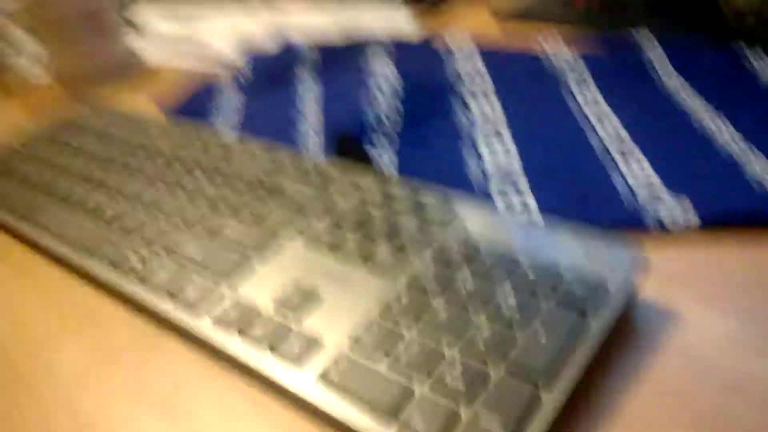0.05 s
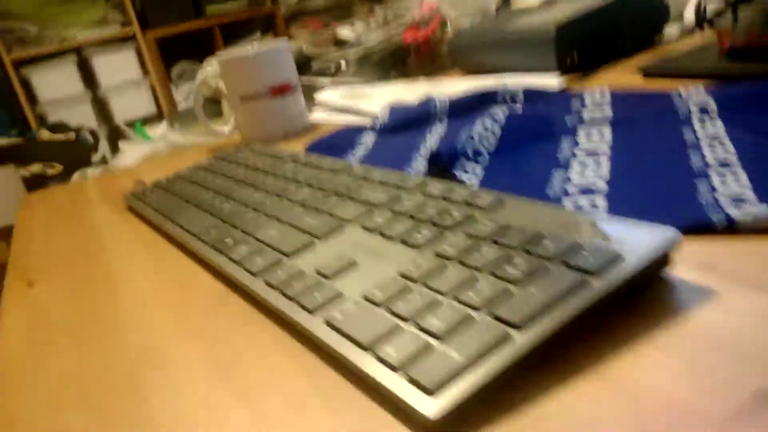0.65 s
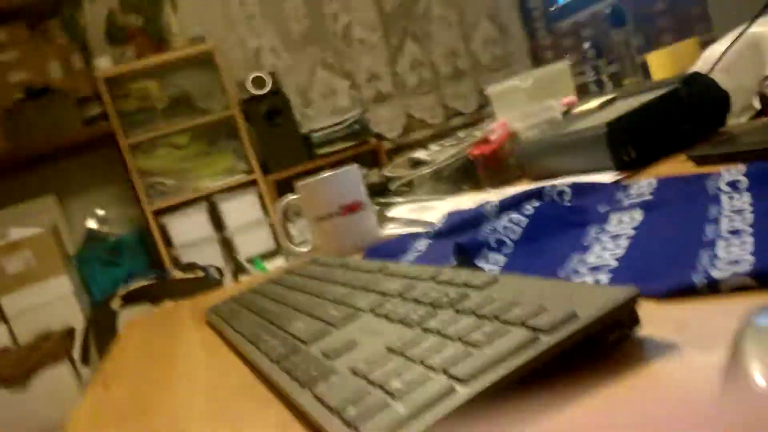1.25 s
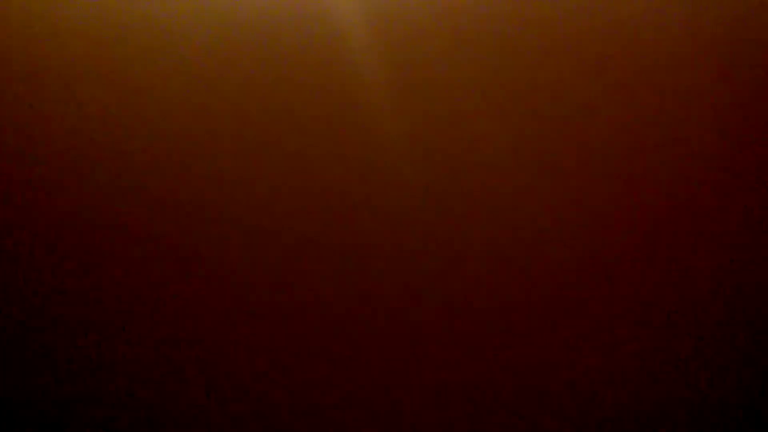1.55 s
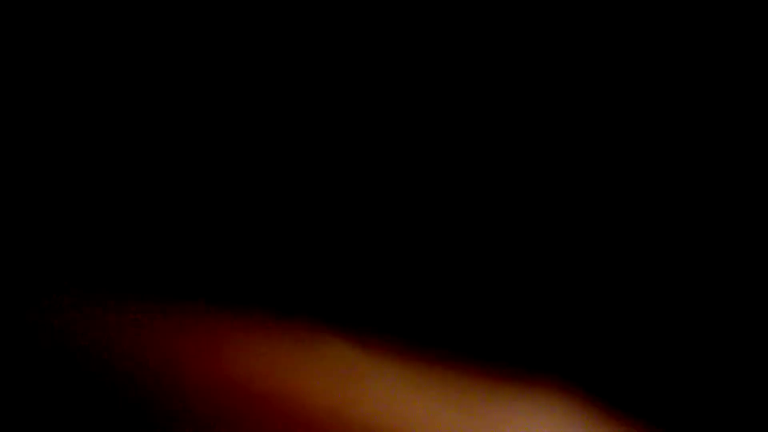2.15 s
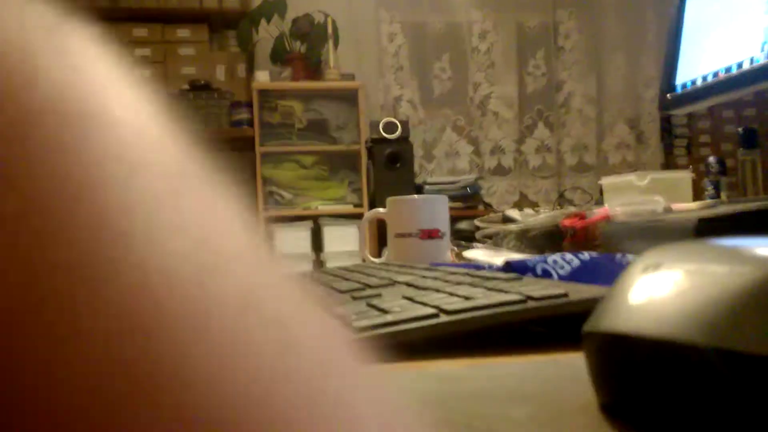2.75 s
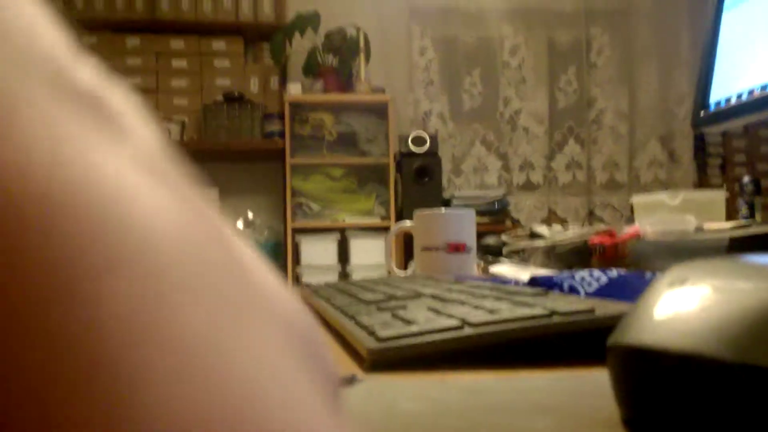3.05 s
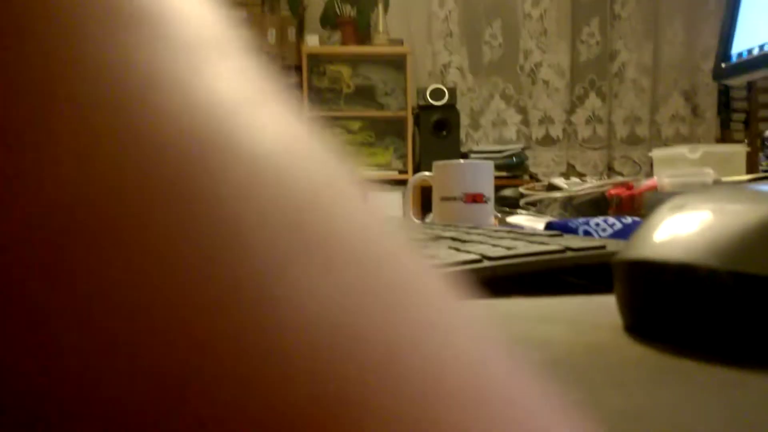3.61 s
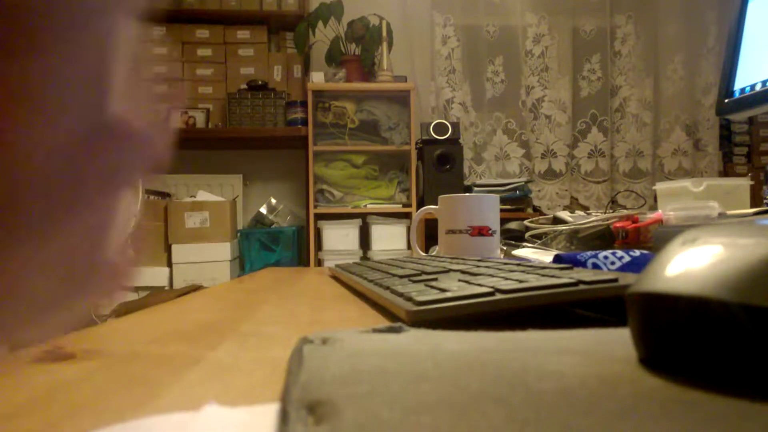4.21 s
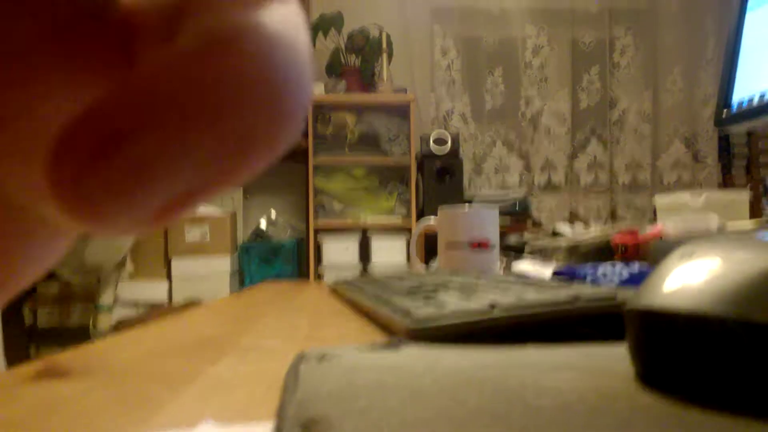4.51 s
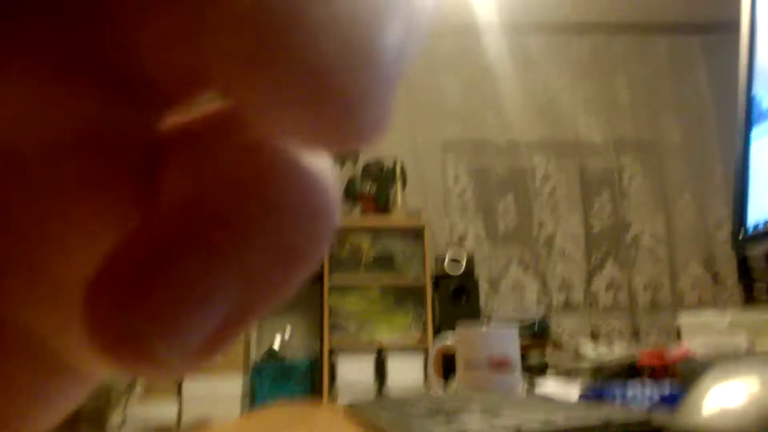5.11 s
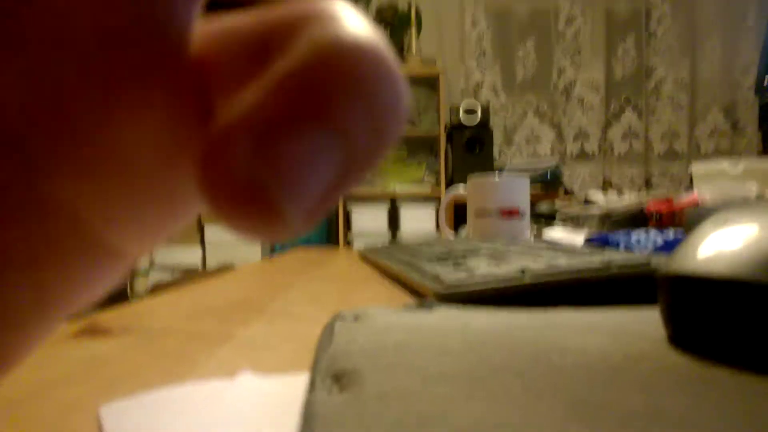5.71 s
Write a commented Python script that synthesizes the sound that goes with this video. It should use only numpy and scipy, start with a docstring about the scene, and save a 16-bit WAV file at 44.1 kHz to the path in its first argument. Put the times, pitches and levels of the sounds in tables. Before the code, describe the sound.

A phone is handled with faint clicks and rustles, knocks down loudly on a wooden desk, then slides and thuds dully.

```python
"""A small room with a wooden desk. A hand carries a phone, sets it down with a knock and shifts it.
Plastic ticks and snaps nearby, a button clicks, a sleeve rustles and fingers bump the case,
all over a quiet hiss and the low rumble of the grip. Each knock rattles the phone's shell and
rings the desk top and its clutter. The phone scuffs along, catching on the grain of the wood,
and drops back with a dull thud."""
import sys
import numpy as np
from scipy import signal
from scipy.fft import rfft, irfft, next_fast_len
from scipy.io import wavfile

SR = 44100
rng = np.random.default_rng(int(sys.argv[2]) if len(sys.argv) > 2 else 0)


def materialize(psi):
    """Save the field psi as 16-bit PCM at rate SR to the path in sys.argv[1].

    A 1-D psi becomes a single channel; in a 2-D psi each row is a channel.
    """
    bounded = np.clip(np.atleast_2d(psi).T, -1, 1)
    quanta = np.round(bounded * 32767).astype(np.int16)
    wavfile.write(sys.argv[1], SR, quanta)


N = 258681
TIME = np.arange(N) / SR
AGE = np.arange(SR // 2) / SR  # seconds since a hit

# The room's decay. Each row: frequency in Hz, t60 in seconds.
ROOM_DECAY = [(100, 0.43), (500, .28), (1500, .26), (5000, 0.19), (12000, .16)]

# Tone colours, drawn like EQ curves. Each row: frequency in Hz, level in dB.
HISS_EQ = [(30, 6), (120, 8), (250, 6.5), (500, 1.5), (1200, -1.5), (2000, -4), (5500, -4.5), (6500, -11.5),
           (7800, -18), (10000, -17.5), (13000, -14.5), (16000, -20)]
HAND_EQ = [(10, -6), (28, -2), (50, -4), (100, -14.5), (200, -23.5), (500, -56)]
CLOTH_EQ = [(150, 9), (400, 5.5), (900, 0), (1600, 1), (2600, -4.5), (4300, -4.5), (5800, -6.5),
            (7000, -16), (9500, -20.5), (12500, -21.5), (16000, -28.5)]
FIZZ_EQ = [(1000, -30), (4000, -0.5), (6000, 0.5), (8000, -5.5), (12500, -3.5), (16000, -6)]  # the finest friction
TICK_EQ = [(200, -12), (600, -5.5), (1000, -6.5), (1700, -2), (2300, -2.5), (2800, -3), (4700, -3),
           (6300, -5.5), (7500, -18.5), (9500, -23.5), (12000, -21), (16000, -24)]
SNAP_EQ = [(200, -5), (600, -1.5), (1200, 1), (1700, -2), (2300, 1.5), (3100, 0), (3800, -16), (6000, -13),
           (8000, -18), (11000, -31), (16000, -43)]
SCRAPE_EQ = [(50, -4.5), (130, 9), (250, 1), (340, -4.5), (600, -1), (1200, -9.5), (2000, -16), (3000, -31),
             (4200, -24.5), (5500, -34), (7500, -45), (12500, -45), (16000, -51)]
CATCH_EQ = [(150, -6.5), (700, -3.5), (1500, 0), (2800, -7), (4500, -6.5), (7000, -20), (16000, -29.5)]  # a hard catch on the wood
CLUTTER_EQ = [(120, -10), (330, 8.5), (600, -3), (1300, -1), (1900, -12.5), (2400, -27.5), (5000, -27.5),
              (7000, -38), (12500, -45), (16000, -47.5)]  # loose things on the desk
CONTACT_EQ = [(30, -21.5), (100, -7), (250, 1), (450, -6), (800, -5), (2000, -12), (5000, -17),
              (6500, -35.5), (9000, -38), (13000, -29.5), (16000, -29.5)]  # the phone meeting the desk

# Resonances of the struck parts. Each row: pitch in Hz, level in dB, t60 in seconds.
PLASTIC_MODES = [(603, -8, .08), (1210, -10, 0.046), (1686, 4, 0.036), (2113, -1, 0.047)]
BUTTON_MODES = [(384, -11, 0.081), (515, -2, 0.093), (804, -13, 0.032), (1120, -6, 0.024),
                (1400, -3, 0.024), (1666, 2, 0.026), (2100, -1.5, 0.025), (2770, -1, 0.016),
                (3860, -5.5, .012), (5500, -8.5, 0.01)]
DESK_MODES = [(47.2, -26, 0.93), (141, -14, 0.16), (202.4, -3, 0.12), (228.8, -5, .12), (279, -11, 0.097),
              (312.2, -4.5, 0.16), (387.3, -5, 0.12), (471.5, 3, 0.085), (603, -28, 0.39),
              (671, -18, 0.069), (910, -21, 0.083), (1105, -7.5, .06), (1286, -14.5, 0.075)]
SHELL_MODES = [(1080, -10, .014), (1328, -2.5, 0.0093), (1890, -0.5, 0.012), (2680, -15.5, 0.01)]
PING_AT, PING = 4.8285, [(1860, -47.5, 0.038), (3600, -53, 0.025), (4260, -50, 0.029)]  # start in s, modes

# The hand shifts its grip. Each row: peak time in seconds, level in dB, length in seconds.
GRIP_SHIFTS = [(1.708, -49, 0.51), (2.351, -54.5, 0.92), (3.379, -57.5, .3), (4.637, -48, 0.27),
               (5.2, -57, 0.39)]
# Soft bumps: low thumps as the phone sways and settles, and higher pats of fingers on the case. Each row: start
# in seconds, level in dB, pitch in Hz, t60 in seconds.
THUMPS_AND_PATS = [(1.028, -38, 219, 0.025), (1.048, -29.5, 30.6, 0.21), (1.69, -40, 83, 0.11),
                   (1.849, -27, 39, 0.095), (2.03, -42.5, 215, 0.031), (2.346, -43, 47.7, 0.33),
                   (2.845, -46, 249, 0.063), (3.042, -45, 209, 0.026), (3.152, -46, 220, 0.03),
                   (3.563, -45.5, 303, 0.077), (3.685, -42, 338, 0.07), (4.672, -21, 73.4, 0.043),
                   (5.025, -41.5, 258, .05), (5.129, -37.5, 246, 0.065), (5.7278, -45, 216, .06)]
# Sleeve and skin brush along. Each row: peak time in seconds, level in dB, length in seconds,
# centre in Hz, fizz trim in dB.
BRUSHES = [(1.277, -59.5, 0.18, 3580, -14), (1.396, -52, 0.069, 4060, -23), (1.78, -49.5, .063, 4300, -23),
           (1.857, -56.5, 0.047, 1580, -9), (1.971, -64.5, 0.4, 1440, -9), (2.221, -58.5, 0.13, 1720, -10),
           (2.44, -66, 0.26, 2400, -2), (2.586, -59, 0.11, 3860, -1.5), (2.67, -63.5, 0.25, 2740, -6),
           (3.159, -53.5, 0.069, 2200, -2.5), (3.215, -51.5, 0.091, 2200, -1),
           (3.869, -61.5, 0.088, 2490, -15)]
# Dry plastic ticks a little way off. Each row: start in seconds, level in dB, length in seconds,
# hardness as a cutoff in Hz, ring in dB.
PLASTIC_TICKS = [(0.4952, -40, 0.043, 12000, -28), (0.564, -42, 0.048, 14000, -21),
                 (.664, -50, 0.035, 4000, -19), (0.676, -43.5, 0.038, 4600, -23),
                 (0.7484, -39, 0.026, 8900, -17), (0.8123, -40, 0.027, 5100, -17),
                 (0.9, -50, 0.045, 12000, -25), (0.916, -46, 0.048, 14000, -29.5)]
# Sharp snaps of plastic. Each row: start in seconds, level in dB, length in seconds.
PLASTIC_SNAPS = [(1.5238, -41.5, 0.039), (1.5457, -28, 0.036)]
# A button pressed and let go. Each row: start in seconds, level in dB.
BUTTON_CLICKS = [(1.6892, -35), (2.3359, -35.5), (2.003, -58.5)]
# The phone slides. Each row: time of top speed in seconds, level in dB, length in seconds,
# grit at top speed in dB.
SLIDES = [(2.886, -55.5, 0.085, -8.5), (3.566, -59.5, 0.14, -20), (3.731, -53, 0.15, -12),
          (4.54, -50.5, 0.058, -14), (4.654, -42, 0.097, -4), (4.768, -59, 0.18, -17),
          (5.012, -58.5, 0.036, -13.5), (5.196, -42.5, 0.12, -9.5), (5.401, -46, 0.059, -19)]
# The sliding phone catches hard on the grain. Each row: start in seconds, level in dB.
HARD_CATCHES = [(3.859, -48), (4.515, -54), (4.589, -52), (4.644, -34), (4.657, -37), (5.196, -38.5),
                (5.376, -56)]
# The phone hits the desk. Each row: start in seconds, level in dB, hardness as a cutoff in Hz,
# desk ring trim in dB, shell rattle trim in dB.
DESK_HITS = [(3.277, -8.5, 7500, 1.5, -35), (3.2805, -3.5, 8900, -9, -4.5), (3.2816, -5, 1510, -8, 5),
             (3.2955, -19.5, 7010, 6, -1), (4.6686, -33.5, 3000, -3, 17.5), (4.671, -15.5, 248, 2, -12),
             (4.699, -29, 295, 7, -8)]


def amp(db):
    """Decibels to gain."""
    return 10 ** (np.asarray(db) / 20)


def unit_rms(x):
    """Scales to rms 1."""
    return x / np.sqrt(np.mean(x ** 2) + 1e-20)


def curve_at(points, hz):
    """Reads a curve on a log-frequency axis."""
    f, value = np.transpose(points)
    return np.interp(np.log(hz + 1), np.log(f + 1), value)


def add(mix, s, sound):
    """Mixes a sound in at s seconds."""
    part = mix[round(s * SR):][:len(sound)]
    part += sound[:len(part)]


def through(x, response):
    """Convolves and keeps the length."""
    return signal.fftconvolve(x, response)[:len(x)]


def cut(x, hz, kind="low", order=2):
    """Low-pass or high-pass; the softer a contact, the lower its low-pass."""
    return signal.sosfilt(signal.butter(order, hz, kind, fs=SR, output="sos"), x)


def impulse(eq, size=4096):
    """A minimum-phase click with this tone colour, of energy 1."""
    log_gain = np.log(amp(curve_at(eq, abs(np.fft.fftfreq(size, 1 / SR)))))
    spectrum = np.exp(np.conj(signal.hilbert(log_gain)))
    pulse = np.fft.ifft(spectrum).real[:size // 2]
    return pulse / np.linalg.norm(pulse)


def noise(eq, grain_db=0):
    """Coloured noise of rms 1; grain_db makes it lumpy, as catching fibres do."""
    lumps = np.interp(TIME, np.linspace(0, N / SR, 3000), rng.standard_normal(3000))
    size = next_fast_len(N)
    bins = rfft(rng.standard_normal(N) * amp(grain_db * lumps), size)
    colour = amp(curve_at(eq, np.fft.rfftfreq(size, 1 / SR)))
    return unit_rms(irfft(bins * colour, size)[:N])


def ring(modes):
    """Dying sines of a struck object."""
    return sum(amp(db - 60 * AGE / t60) * np.sin(2 * np.pi * hz * AGE) for hz, db, t60 in modes)


def chatter(length, rise):
    """A burst of tiny contacts that swells and dies away, 60 dB in length seconds."""
    return rng.standard_normal(len(AGE)) * amp(-60 * AGE / length) * (1 - np.exp(-AGE / rise))


def stroke(t, length, rise_share=0.59, shape=2):
    """Bell-shaped speed of one gesture: up to 1 at t = 0 and down again."""
    width = length * np.where(t < 0, rise_share, 1 - rise_share)
    return np.exp(-abs(t / width) ** shape)


def room(x, wet_db, delay, linger=0.82):
    """Adds dense reflections from desk clutter and walls, each band dying at its own speed."""
    taps = rng.choice([-1., 1.], len(AGE)) * (rng.random(len(AGE)) < .2) * (AGE > delay)
    hz, t, bands = signal.stft(taps, SR, nperseg=256)
    t60 = linger * curve_at(ROOM_DECAY, hz)[:, None]
    tail = signal.istft(bands * amp(-60 * t / t60), SR, nperseg=256)[1]
    return x + amp(wet_db) * through(x, tail / np.linalg.norm(tail))


def hiss():
    """A quiet, steady bed under everything."""
    return amp(-66.5) * noise(HISS_EQ)


def grip(rest_db=-60.5):
    """Low rumble of the holding hand, swelling as it shifts, with soft thumps and finger pats."""
    shift_power = sum((amp(db) * stroke(TIME - s, length)) ** 2 for s, db, length in GRIP_SHIFTS)
    rumble = noise(HAND_EQ) * np.sqrt(amp(rest_db) ** 2 + shift_power)
    bumps = np.zeros(N)
    for s, db, hz, t60 in THUMPS_AND_PATS:
        add(bumps, s, ring([(hz, db, t60)]))
    return rumble + room(bumps, wet_db=-8.5, delay=0.0026)


def sleeve_rustles():
    """Fibres catch and slip: each brush swells and fades, its hiss gathered round its own pitch."""
    out, t = np.zeros(N), np.arange(-16384, 16384) / SR
    hz = np.fft.rfftfreq(len(t), 1 / SR)
    cloth, fine = amp(curve_at(CLOTH_EQ, hz)), amp(curve_at(FIZZ_EQ, hz))
    for s, db, length, centre_hz, fizz_db in BRUSHES:
        lumps = np.interp(t, t[::80], rng.standard_normal(len(t[::80])))
        rub = rfft(rng.standard_normal(len(t)) * amp(1.9 * lumps))
        octaves = 1.05 * 2000 / centre_hz  # faster, brighter brushes are narrower
        focus = amp(-11.5) + np.exp(-.5 * (np.log2((hz + 1) / centre_hz) / octaves) ** 2)
        body = unit_rms(irfft(rub * focus * cloth))
        fizz = amp(fizz_db - 12) * unit_rms(irfft(rub * fine))
        add(out, s + t[0], amp(db) * stroke(t, length, rise_share=.44) * (body + fizz))
    return out


def ping():
    """A tiny hard part, touched once, rings."""
    out = np.zeros(N)
    add(out, PING_AT, amp(-3) * ring(PING))
    return out


def plastic_ticks():
    """Plastic parts catch and let go: a short chatter, a faint ring and a small thud."""
    out, colour, plastic = np.zeros(N), impulse(TICK_EQ), ring(PLASTIC_MODES)
    for s, db, length, hard_hz, ring_db in PLASTIC_TICKS:
        burst = through(chatter(length, rise=0.0016), colour)
        thud_db = 7.5 - 7 * np.log2(hard_hz / 8000)  # the softer a tick, the more it thuds
        thud = amp(thud_db) * cut(chatter(length=0.068, rise=0.00078), 310)
        ringing = amp(ring_db) * through(chatter(length=0.0078, rise=0.00071), plastic)
        tick = amp(db) * cut(burst + thud + ringing, hard_hz)
        add(out, s, room(tick, wet_db=-1.5, delay=0.0065, linger=0.96))
    return out


def plastic_snaps():
    """A small catch and then a hard snap with a fine sizzle."""
    out, colour = np.zeros(N), impulse(SNAP_EQ)
    for s, db, length in PLASTIC_SNAPS:
        add(out, s, amp(db) * through(chatter(length, rise=0.0028), colour))
    s, db, _ = PLASTIC_SNAPS[-1]
    sizzle = through(chatter(length=0.17, rise=.002), impulse(FIZZ_EQ))
    add(out, s, amp(db - 28) * sizzle)
    return room(out, wet_db=-7.5, delay=.006, linger=0.9)


def button_clicks():
    """The button's spring flips, rings its hollow housing and thumps its base."""
    out = np.zeros(N)
    housing = ring(BUTTON_MODES[::2]) - ring(BUTTON_MODES[1::2])  # neighbouring modes swing opposite ways
    for s, db in BUTTON_CLICKS:
        rattle = through(chatter(length=0.1, rise=0.002), impulse(CLUTTER_EQ))
        add(out, s, amp(db) * (housing + amp(-4.5) * cut(rattle, 1400)))
    return room(out, wet_db=-11, delay=0.0037, linger=0.67)


def phone_scuffs(light_catches_per_s=30):
    """The sliding phone rubs the desk; speed adds grit, and now and then it catches on the grain."""
    rub = noise(SCRAPE_EQ, grain_db=2.5)
    body = unit_rms(cut(rub, 2400, "low", order=3))
    grit = unit_rms(cut(rub, 2400, "high", order=3))
    body_gain, grit_gain = np.zeros(N), np.zeros(N)
    for s, db, length, grit_db in SLIDES:
        speed = stroke(TIME - s, length, rise_share=0.57, shape=1.85)
        body_gain += amp(db) * speed
        grit_gain += amp(db + grit_db) * speed ** 1.95
    snags = amp(-0.5) * body_gain * (rng.random(N) < light_catches_per_s / SR)
    for s, db in HARD_CATCHES:
        add(snags, s, amp([db]))
    bursts = through(snags, chatter(length=0.022, rise=0.00063))
    catches = through(bursts, impulse(CATCH_EQ))
    return room(body_gain * body + grit_gain * grit + catches, wet_db=-12.5, delay=0.00626, linger=0.89)


def phone_knocks():
    """Each hit jolts the phone, rattles its shell and shakes the desk top with everything on it."""
    out, desk, shell = np.zeros(N), ring(DESK_MODES), ring(SHELL_MODES)
    clutter = impulse(CLUTTER_EQ)
    edge = amp(-12) * impulse(CATCH_EQ) + amp(-32) * impulse(FIZZ_EQ)
    punch = cut(impulse(CONTACT_EQ), 60, "high", order=1)  # the phone springs back
    for s, db, hard_hz, desk_db, shell_db in DESK_HITS:
        loose = amp(-10) * cut(through(chatter(length=0.098, rise=.002), clutter), 2200)
        crack = through(chatter(length=0.0092, rise=.0002), edge)
        hit = amp(desk_db) * (amp(-9.5) * desk + loose) + amp(shell_db - 11.5) * shell + crack
        add(hit, 0, amp(-0.8) * punch / punch.max())
        add(out, s, amp(db) * cut(hit, hard_hz))
    return room(out, wet_db=-17, delay=0.0026, linger=1.0)


def scene():
    """The mono mix: a soft bed, small details and the phone up front."""
    bed = hiss() + grip() + sleeve_rustles()
    details = ping() + plastic_ticks() + plastic_snaps() + button_clicks()
    return (bed + details + phone_scuffs() + phone_knocks())[None]


def record(dry):
    """A steep high cut at 15.9 kHz."""
    high_cut = signal.firwin(511, 15900, window=("kaiser", 9), fs=SR)
    return signal.oaconvolve(dry, high_cut[None], "same")


dry = scene()
out = record(dry)
materialize(out)
```